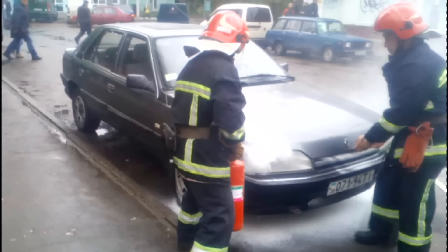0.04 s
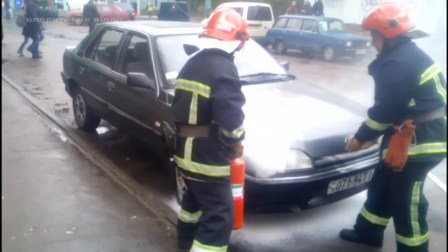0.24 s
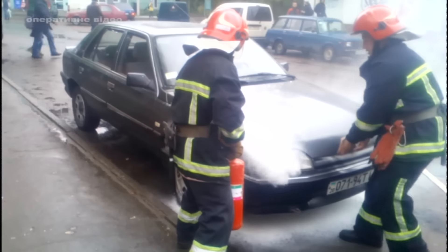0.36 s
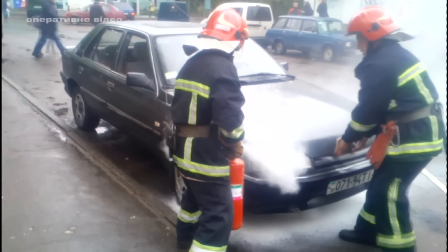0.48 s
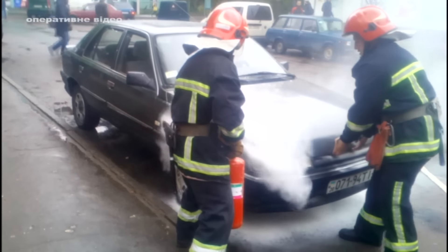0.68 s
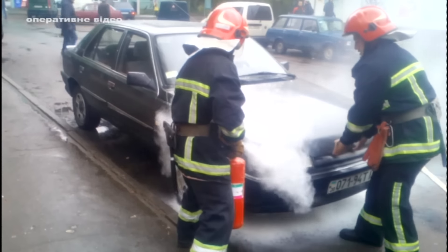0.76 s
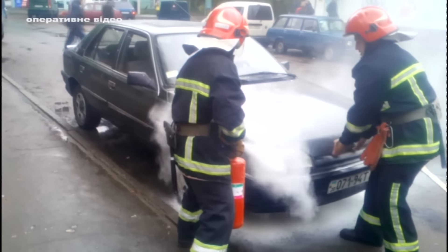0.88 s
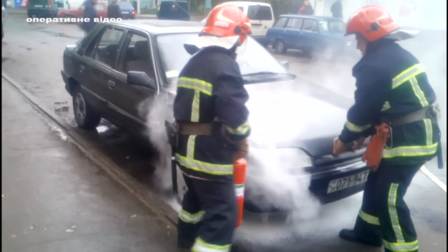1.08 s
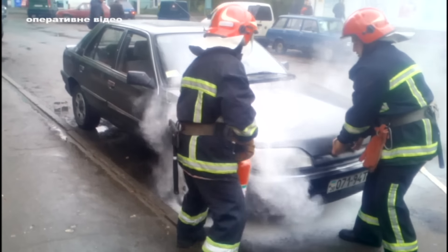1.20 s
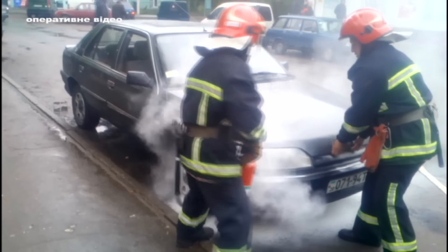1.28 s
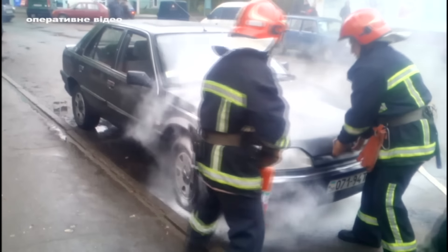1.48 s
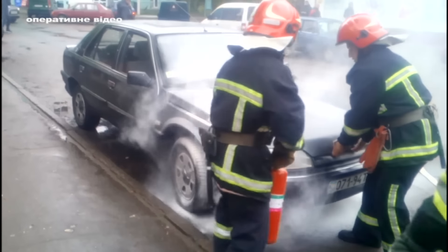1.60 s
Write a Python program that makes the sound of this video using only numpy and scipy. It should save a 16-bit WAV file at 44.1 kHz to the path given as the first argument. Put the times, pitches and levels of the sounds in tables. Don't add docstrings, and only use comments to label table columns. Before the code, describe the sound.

A fire extinguisher sprays powder in a loud, steady, slightly sputtering hiss, shuts off quickly, then a sharp metallic clack with a low panel thud; faint scuffs and ticks follow over street hum, close phone microphone.

```python
import sys
import numpy as np
from scipy import signal
from scipy.fft import rfft, irfft
from scipy.io import wavfile
from scipy.ndimage import uniform_filter1d

SR = 44100
rng = np.random.default_rng(int(sys.argv[2]) if len(sys.argv) > 2 else 0)


def amplitude_ratio(level_db):
    exponent = np.asarray(level_db, float) / 20
    return 10 ** exponent


def to_wav(sig):
    pcm = np.clip(np.atleast_2d(sig), -1, 1) * 32767
    pcm = np.round(pcm).astype(np.int16)
    wavfile.write(sys.argv[1], SR, pcm.T)


N = 72765
T = np.arange(N) / SR
F = np.arange(N // 2 + 1) * SR / N + 1
START_S = 0.084

# [t/s, level/dB]
JET_FLOW = [
    (0.09, -29.5),
    (0.612, -29),
    (0.646, -26.5),
    (0.66, -28.5),
    (0.996, -29.5),
    (1.088, -28.5),
    (1.22, -35),
    (1.306, -52.5),
    (1.31, -43),
]
# [f/Hz, level/dB per Hz]
JET_COLOUR = [(150, -13.5), (280, -8), (900, -7.5), (2000, -2), (4600, -6.5), (5300, -9.5), (8500, -25),
              (15000, -39)]
# [f/Hz, level/dB, t60/s]
LATCH_MODES = [(1200, -17, 0.059), (1400, -17, 0.065), (1744, -8, 0.063), (1930, -9, 0.045),
               (2420, -21, 0.12), (4030, -14, 0.013), (4587, 6, 0.02), (4660, -4.5, 0.017),
               (5250, -4, 0.013), (5335, 7, 0.023), (6557, -2, 0.028)]
# [f/Hz, level/dB, t60/s]
PANEL_MODES = [(203, -15, 0.18), (252, -5.5, 0.14), (267.8, 0, 0.22), (276, -23, 0.16), (501, -8, .1),
               (643, -1, 0.087), (683, -2, 0.13), (937, -9, .08)]
# [f/Hz, level/dB per Hz]
CRACK_COLOUR = [(200, -9.5), (900, -18), (1500, 2.5), (4600, -5), (5800, -3.5), (8000, -24.5), (12000, -20),
                (15500, -46)]
# [t/s, length/s, centre f/Hz, width/Hz, level/dB]
RUBS = [
    (1.247, .008, 4500, 4000, -44),
    (1.372, .018, 4600, 3000, -45),
    (1.515, .012, 3400, 800, -44),
    (1.521, .017, 4000, 1500, -42),
    (1.611, .009, 4400, 4500, -29),
    (1.612, .012, 11000, 9000, -52),
    (1.62, .022, 2600, 4500, -41),
    (1.622, .02, 700, 600, -38),
]
# [f/Hz, level/dB]
ENGINE_LINES = [(96.9, -39), (145.3, -42)]
# [f/Hz, level/dB per Hz]
STREET_COLOUR = [(30, -33), (70, -5.5), (230, -4.5), (700, -13.5), (1400, -20.5), (4600, -28.5),
                 (7500, -39), (15500, -71)]
# [f/Hz, likeness/0-1]
NEAR_LIKENESS = [(100, .995), (700, .93), (2000, .75), (4500, .75), (7000, .5), (12000, .3)]
# [f/Hz, likeness/0-1]
FAR_LIKENESS = [(100, .995), (300, .95), (640, .8), (1400, .15), (4000, .3), (12000, .1)]
# [f/Hz, level/dB]
PORT_LEVEL = [(100, -.5), (600, -1.5), (1300, 3), (2400, -3), (4400, -7), (6500, 2), (10500, 2.8),
              (13000, -10)]
# [f/Hz, lead/rad]
PORT_PHASE = [(100, 0), (2500, 0), (4000, .6), (4600, .9), (5400, 2.3), (7000, 3.2), (9000, 3.2)]


def unit(x):
    return x / np.sqrt(np.mean(x ** 2))


def over_hz(table):
    hz, value = np.array(table, float).T
    return np.interp(np.log(F), np.log(hz), value)


def tinted(x, colour):
    return irfft(rfft(x) * amplitude_ratio(over_hz(colour)), N)


def white():
    return rng.standard_normal(N)


def walk(rate):
    hold = int(SR / rate)
    steps = np.repeat(rng.standard_normal(N // hold + 1), hold)
    return unit(uniform_filter1d(uniform_filter1d(steps, hold), hold)[:N])


def ring(x, hz, t60):
    pole = np.exp((2j * np.pi * hz - np.log(1000) / t60) / SR)
    return signal.lfilter([1], [1, -pole], x).imag


def spread(make, likeness):
    c = np.clip(over_hz(likeness), 0, 1)
    mid = rfft(make()) * np.sqrt((1 + c) / 2)
    side = rfft(make()) * np.sqrt((1 - c) / 2)
    return irfft(np.array([mid + side, mid - side]), N)


def flickering(x, colour, shared_db, own_db, rate):
    spectrum, out = rfft(x) * amplitude_ratio(over_hz(colour)), 0
    for hz in 2 ** np.arange(4, 14.5, .5):
        band = np.clip(1 - 2 * abs(np.log2(F / hz)), 0, 1)
        out = out + irfft(spectrum * band, N) * amplitude_ratio(shared_db + own_db * walk(rate))
    return unit(out)


def jet():
    clots_per_s, clot_scatter_db, puff_decay_s, sputter_db = 700, 2.5, 0.0013, -14
    echo_s, echo_gain = 0.001822, 0.43
    clots = (rng.random(N) < clots_per_s / SR) * amplitude_ratio(clot_scatter_db * rng.exponential(size=N))
    puffs = unit(signal.lfilter([1], [1, -np.exp(-1 / (puff_decay_s * SR))], clots))
    gas = spread(white, NEAR_LIKENESS) * (1 + amplitude_ratio(sputter_db) * puffs)
    reflection = 1 + echo_gain * np.exp(-2j * np.pi * F * echo_s)
    swell_db = .4 * walk(25.5)
    roar = flickering(irfft(rfft(gas) * reflection, N), JET_COLOUR, swell_db, .7, 40.2)
    s, db = np.array(JET_FLOW).T
    jet_span = (T < s[-1]) * (T > START_S / 2)
    return roar * amplitude_ratio(np.interp(T, s, db) + 1.5) * jet_span


def at_level(x, db):
    return amplitude_ratio(db) * x / np.sqrt(np.sum(x ** 2) / (0.021 * SR))


def slam():
    scrape_s, strike_s, land_s, rebound_s = 1.3178, 1.3255, 1.3285, 0.00435
    push_s, latch_fade_s, rattle_fade_s, tail_t60_s = 0.00046, 0.004, 0.013, 0.27
    late = (T - strike_s).clip(0)

    rise_db = 10 * ((T - strike_s) / (strike_s - scrape_s)).clip(-2, 0)
    scrape = white() * amplitude_ratio(rise_db) * (T > scrape_s) * np.exp(-late / latch_fade_s)
    latch = sum(amplitude_ratio(db) * ring(scrape, hz, t60) for hz, db, t60 in LATCH_MODES)
    crack = tinted(scrape, CRACK_COLOUR)

    push = 0
    for s, gain in ((land_s, .7), (land_s + rebound_s, 1)):
        push = push + gain * np.gradient(np.exp(-((T - s) / push_s) ** 2))
    panel = 0
    for hz, db, t60 in PANEL_MODES:
        detune = 1 + 0.0038 * rng.standard_normal()
        panel = panel + amplitude_ratio(db) * ring(push, hz * detune, t60)

    def dull(hz):
        return tinted(ring(white(), hz, 0.00017), CRACK_COLOUR) * (T > strike_s)

    rattle = dull(1900.0) * np.exp(-late / rattle_fade_s)
    tail = dull(2100.0) * amplitude_ratio(-60 * late / tail_t60_s)
    return (at_level(latch, -13.5) + at_level(crack, -21) + at_level(panel, -16)
            + at_level(rattle, -20) + at_level(tail, -27))


def scuffs():
    out = 0
    for s, length, hz, width_hz, db in RUBS:
        u = ((T - s) / length).clip(0)
        grains = white() * amplitude_ratio(1.7 * walk(900))
        band = amplitude_ratio(-38) + 1 / (1 + ((F - hz) / width_hz * 2) ** 4)
        grit = unit(irfft(rfft(grains) * band, N))
        out = out + amplitude_ratio(db) * grit * (1 - np.exp(-u / 0.1)) * np.exp(-u ** 2)
    return out


def idle():
    turned_s = np.cumsum(1 + .015 * walk(5)) / SR
    out = 0
    for hz, db in ENGINE_LINES:
        level = amplitude_ratio(db + 3 + 1.5 * walk(11.45))
        out = out + level * np.sin(2 * np.pi * (hz * turned_s + rng.random()))
    return out


def street():
    wash = spread(white, FAR_LIKENESS)
    return amplitude_ratio(-36) * flickering(wash, STREET_COLOUR, 0.32 * walk(1.6), 0.4, 11.66)


def scene():
    near = jet() + spread(slam, NEAR_LIKENESS) + spread(scuffs, NEAR_LIKENESS)
    return near + idle() + street()


def thinned(x):
    above_hz, under_db, follows = 7000, -27, .9
    hz, _, z = signal.stft(x, SR, nperseg=2048)
    power = abs(z) ** 2 + 1e-20
    loud = power.mean(axis=(0, 1))
    usual = np.median(loud)
    floor = usual * (loud / usual) ** follows * amplitude_ratio(2 * under_db)
    bands = power[:, :-1].reshape(2, -1, 4, len(loud)).mean(axis=2)
    bands = np.repeat(bands, 4, axis=1)
    z[:, :-1] *= (bands > floor) | (hz[:-1, None] < above_hz)
    return signal.istft(z, SR, nperseg=2048)[1][:, :N]


def ports(dry):
    echo_s, echo_gain, echo_above_hz = 0.000488, 0.27, 2900
    notch_hz, notch_width_hz, top_hz = 8020, 1330, 15100
    half = amplitude_ratio(over_hz(PORT_LEVEL) / 2) * np.exp(.5j * over_hz(PORT_PHASE))
    off_notch = ((F - notch_hz) / (notch_width_hz / 2)) ** 4
    highpass = F ** 2 / (F ** 2 + echo_above_hz ** 2)
    echo = echo_gain * highpass * np.exp(-2j * np.pi * F * echo_s)
    right = (1 + echo) * off_notch / (1 + off_notch)
    lowpass = 1 / (1 + (F / top_hz) ** 60)
    return irfft(rfft(dry) * np.array([half, right / half]) * lowpass, N)


def low_pass(x):
    return signal.sosfilt(signal.butter(12, 16030, fs=SR, output="sos"), x)


def record(dry):
    limited = 1.38 * np.tanh(thinned(ports(dry)) / 1.42)
    fade_in = ((T - START_S) / 0.0037).clip(0, 1)
    return low_pass(limited * fade_in)


dry = scene()
out = record(dry)
to_wav(out)
```